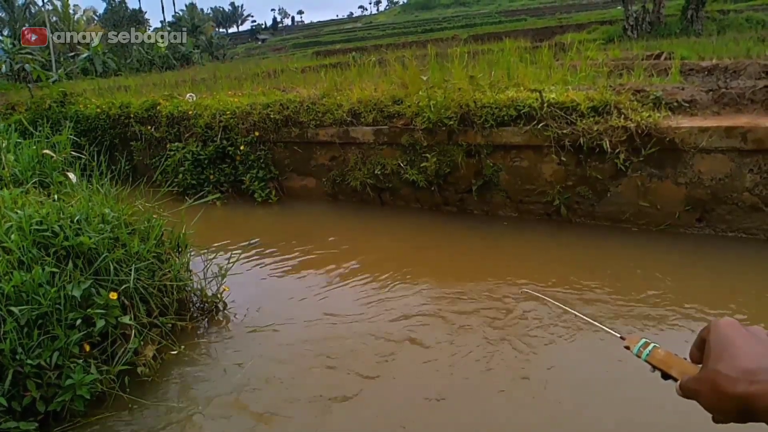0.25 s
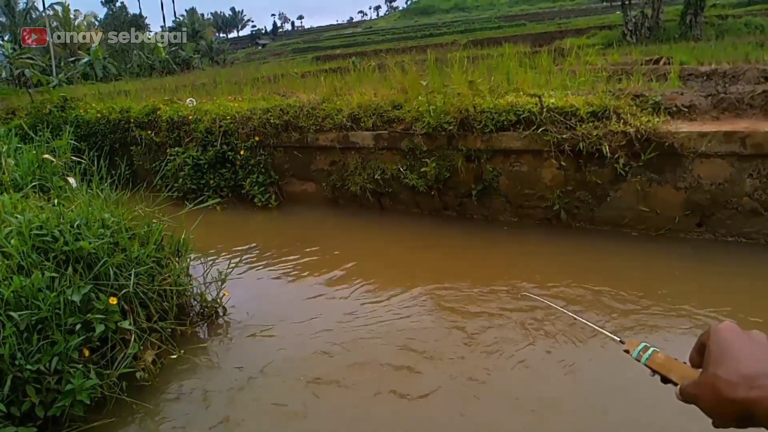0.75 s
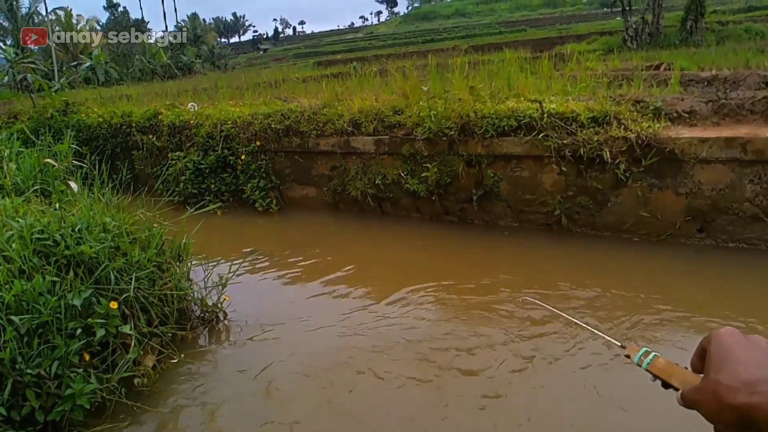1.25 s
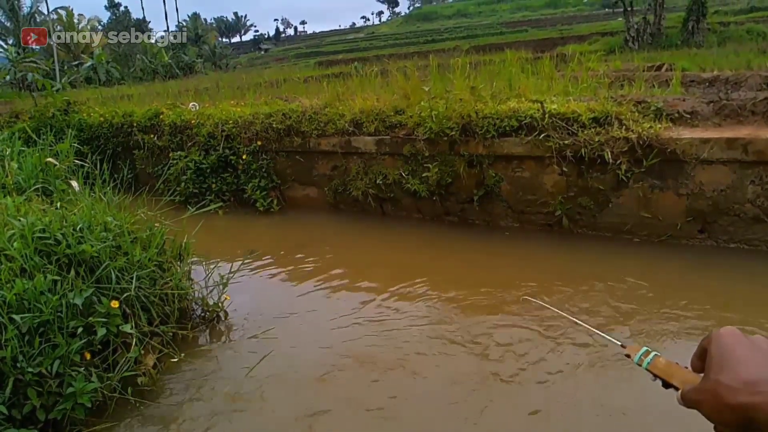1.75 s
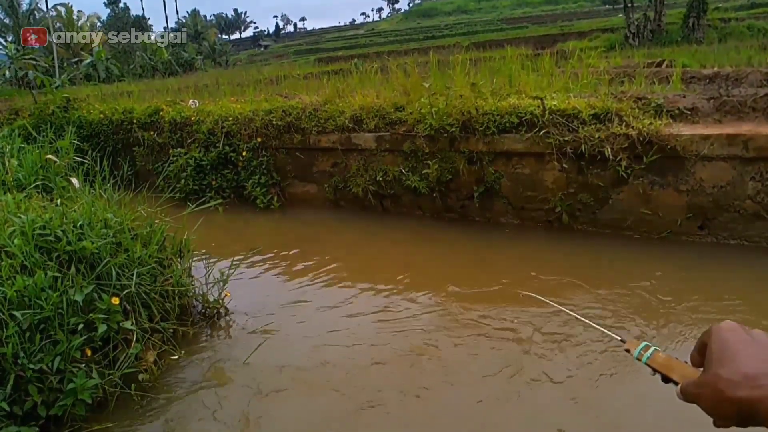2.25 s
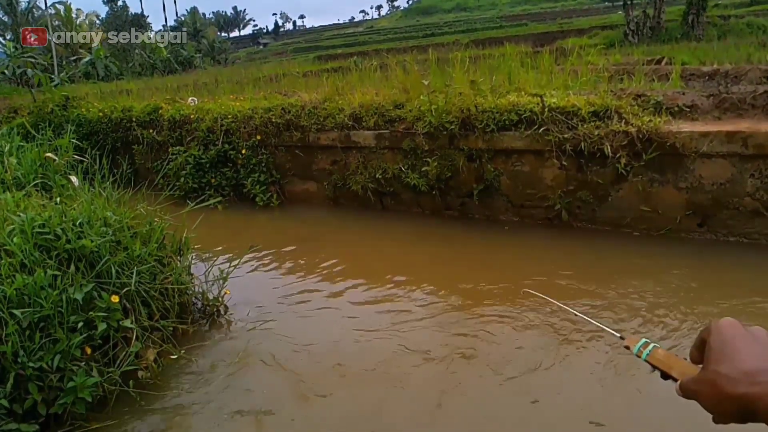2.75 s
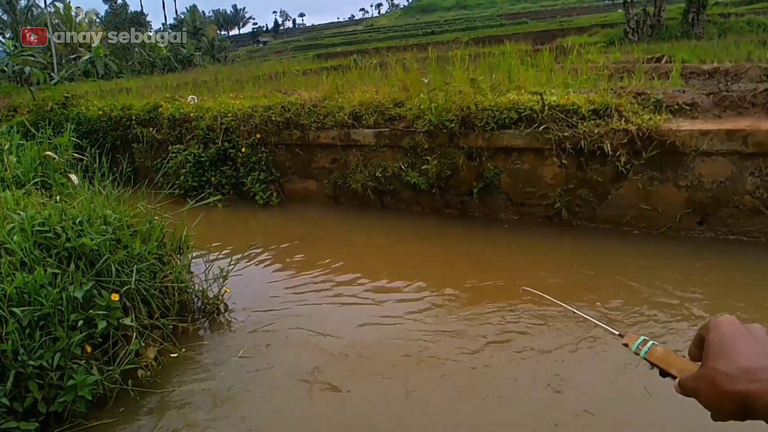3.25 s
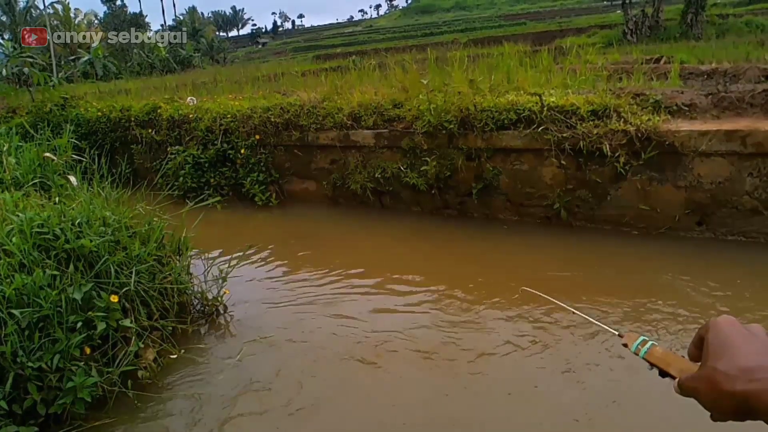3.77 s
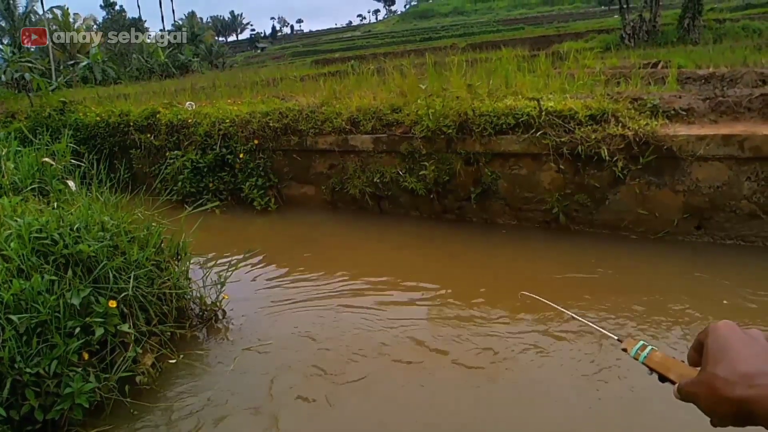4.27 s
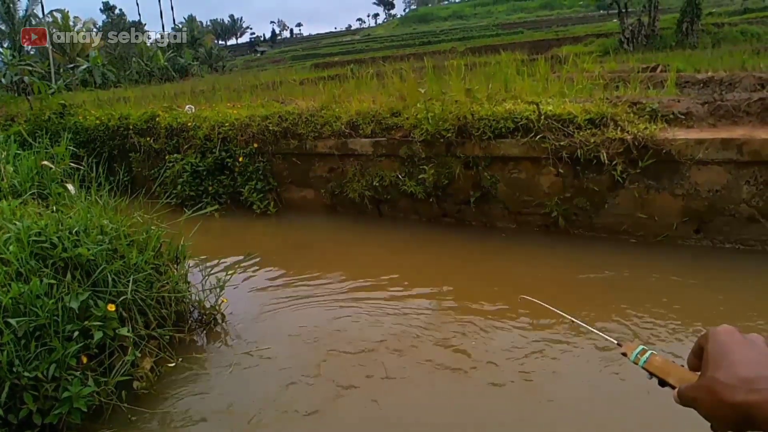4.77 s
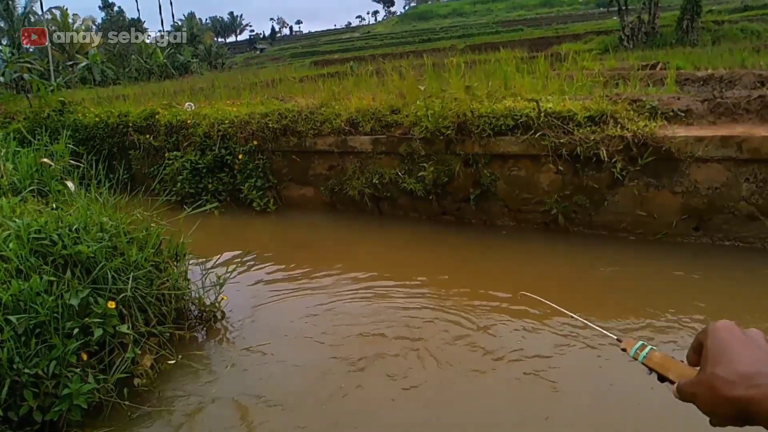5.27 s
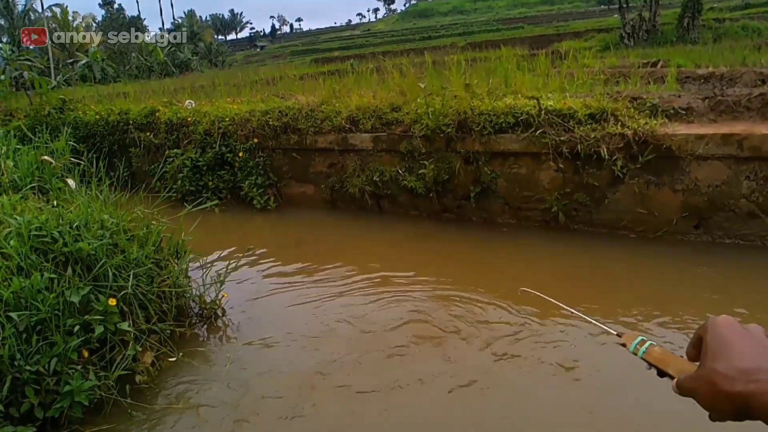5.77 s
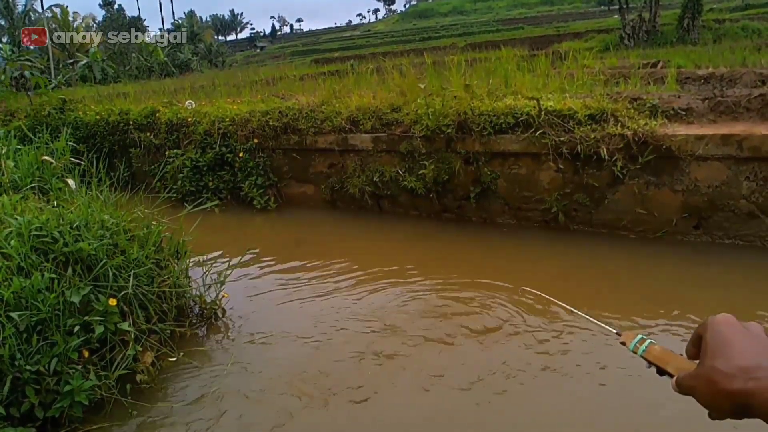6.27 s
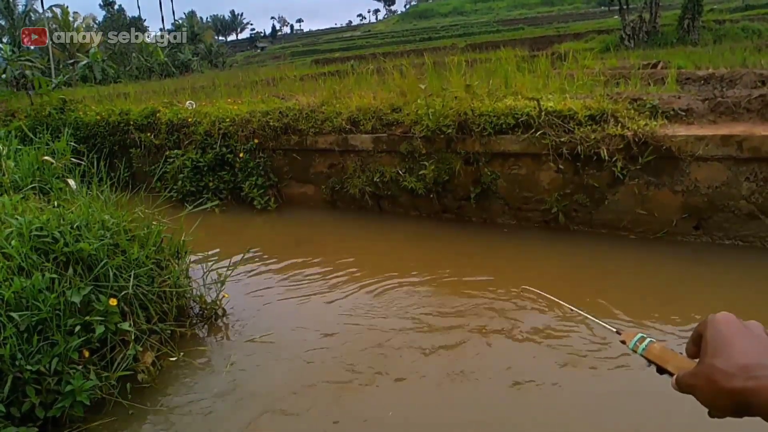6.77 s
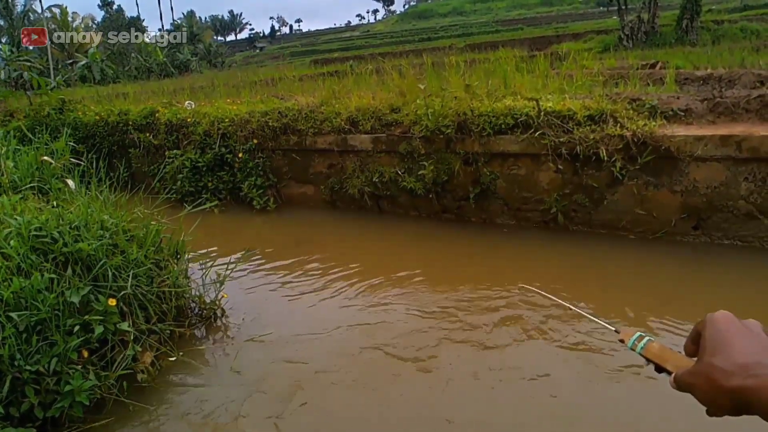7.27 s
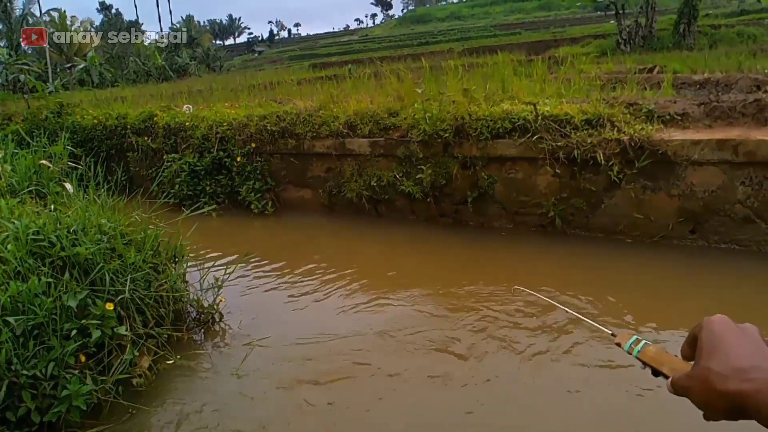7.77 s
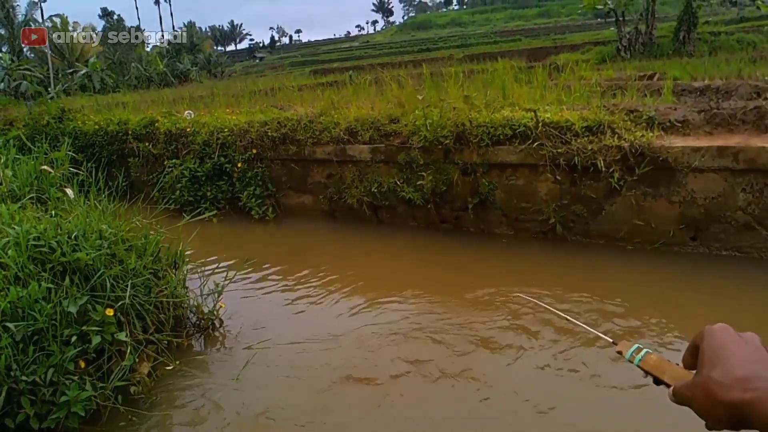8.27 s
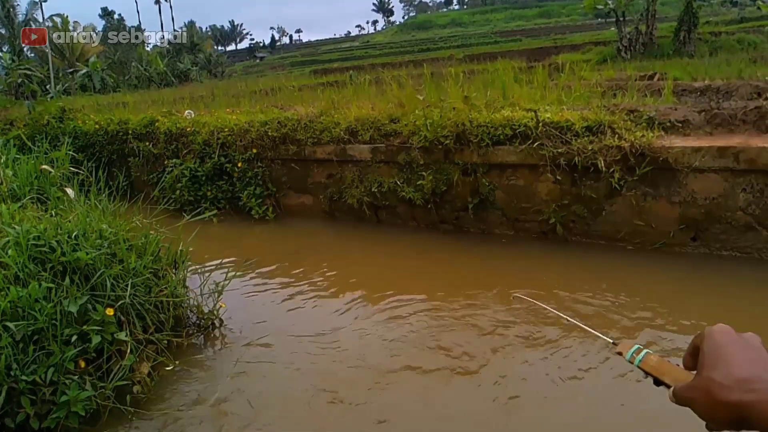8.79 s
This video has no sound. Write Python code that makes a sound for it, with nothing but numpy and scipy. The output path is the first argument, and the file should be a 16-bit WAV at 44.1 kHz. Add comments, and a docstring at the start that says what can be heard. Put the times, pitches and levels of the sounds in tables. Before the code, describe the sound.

In open fields, a small stream babbles close by without a break. High insect songs grow and stop abruptly in the grass, first a near pulsing buzz, then a more distant one, over trills and a faint shimmer. A few thin bird whistles come from far off. Beneath it all, a low distant drone fades and light wind rumbles on the microphone, gusting briefly towards the end.

```python
"""Muddy water runs steadily along a ditch between rice terraces: turbulent rush and ringing bubbles.
A light breeze rumbles on the microphone, with one gust, over a fading distant drone and faint hiss.
In the grass two bush crickets chirp and three crickets trill, scraper on wing file; their songs
swell, then break off. Far insects shimmer, and a small bird whistles now and then, far away."""
import sys
import numpy as np
from scipy import signal
from scipy.fft import rfft, irfft, next_fast_len
from scipy.io import wavfile
from scipy.ndimage import uniform_filter1d, map_coordinates

SR = 44100
rng = np.random.default_rng(int(sys.argv[2]) if len(sys.argv) > 2 else 0)


def transcribe(u):
    """Save the signal u as a 16-bit wav file named by the first command-line argument.

    u: samples, shape (n,) or (channels, n), limited to [-1, 1]; the rate is SR.
    q: integer samples, one column per channel.
    """
    v = np.clip(np.atleast_2d(u).T, -1, 1)
    q = np.round(v * 32767).astype(np.int16)
    wavfile.write(sys.argv[1], SR, q)


N = 398223


def amp(db):
    """Decibels to gain."""
    return 10 ** (np.asarray(db) / 20)


def unit(x):
    """x at rms 1."""
    return x / np.sqrt(np.mean(x ** 2) + 1e-20)


def wobble(knots_per_s):
    """Smooth random curve."""
    knots = rng.standard_normal(int(N * knots_per_s / SR) + 4)
    return map_coordinates(knots, [np.arange(N) * knots_per_s / SR])


def filtered(x, response):
    """x through a zero-phase gain response(hz)."""
    size = next_fast_len(N + SR // 2)
    return irfft(rfft(x, size) * response(np.fft.rfftfreq(size, 1 / SR)), size)[:N]


def coloured(x, spectrum):
    """x shaped by (frequency [Hz], level [dB]) points on a log axis, at rms 1."""
    points_hz, db = np.transpose(spectrum)
    return unit(filtered(x, lambda hz: amp(np.interp(np.log(hz + 1), np.log(points_hz), db))))


def patchy_noise(depth_db):
    """White noise with drifting patches of gain."""
    spectra = signal.stft(rng.standard_normal(N), nperseg=1024)[2]
    patches = uniform_filter1d(rng.standard_normal(spectra.shape), 6, axis=0)
    patches = uniform_filter1d(patches, 7, axis=1)
    return signal.istft(spectra * amp(depth_db * unit(patches)), nperseg=1024)[1][:N]


def bubbles(count, centre_hz, log_spread, decay_cycles, size_db):
    """Damped sines whose pitch rises as each bubble nears the surface."""
    t = np.arange(SR // 25) / SR
    hz = np.clip(centre_hz * np.exp(log_spread * rng.standard_normal((count, 1))), 200, 5000)
    age = t * hz / decay_cycles
    size = amp(size_db * np.minimum(rng.exponential(size=(count, 1)), 4))
    rise = 1 + 0.032 * np.minimum(age, 5)
    envelope = size * np.exp(-age) * (1 - np.exp(-t * hz))
    ring = envelope * np.sin(2 * np.pi * hz * t * rise)
    index = rng.integers(0, N, (count, 1)) + np.arange(len(t))
    return unit(np.bincount(index.ravel(), ring.ravel(), N)[:N])


def water():
    """Turbulent rush with a dense babble of bubbles; wavelets fold over and gurgle."""
    # rush spectrum: (frequency [Hz], relative level [dB])
    rush_spectrum = [(60, -14), (140, 4.5), (230, 3.5), (310, 1.5), (540, -2), (660, -1.5), (1000, -4),
                     (1330, -3), (1550, -8), (1850, -9.5), (2300, -15.5), (2650, -15), (3100, -23),
                     (6000, -34), (15000, -55)]
    # folding wavelets: (time [s], gurgle rise [dB])
    folds = [(2.645, 8.5), (3.06, 7), (3.8, 7)]
    t = np.arange(N) / SR
    rush = coloured(patchy_noise(depth_db=0.5), rush_spectrum)
    babble = bubbles(count=3500, centre_hz=850.4, log_spread=0.36, decay_cycles=8.5, size_db=2)
    fold_db = 2.2 * wobble(14) + sum(db * np.exp(-((t - at_s) / 0.024) ** 2) for at_s, db in folds)
    gurgle = bubbles(count=1500, centre_hz=1100.4, log_spread=0.2215, decay_cycles=12.4, size_db=2)
    flow_db = -47 + 0.56 * wobble(0.57)
    return amp(flow_db) * (amp(0.75) * rush + amp(-9) * babble + amp(fold_db - 12.5) * gurgle)


def air():
    """Breeze on the microphone with one gust, a slowly receding drone and an even hiss."""
    # wind rumble and hiss spectra: (frequency [Hz], relative level [dB])
    rumble_spectrum = [(10, -6), (30, 2.5), (57, 4.5), (75, -3), (120, -8), (200, -18.5), (400, -30),
                       (1500, -94)]
    hiss_spectrum = [(1500, -6.5), (3000, -0.5), (3700, 4), (4600, 7), (5300, 4.5), (6300, 3.5), (10500, 2),
                     (15500, 2)]
    drone_spectrum = [(60, -25), (93, -2.5), (120, -11), (250, -26.5), (600, -90)]
    gust_s, gust_width_s, gust_db = 8.04, 0.54, 7.5
    t = np.arange(N) / SR
    gust = np.exp(-((t - gust_s) / gust_width_s) ** 2)
    breeze_db = -44.5 + 0.7 * wobble(2.13) + gust_db * gust
    drone_db = -47.5 - 0.55 * t + 1.5 * wobble(1.484)
    rumble = amp(breeze_db) * coloured(rng.standard_normal(N), rumble_spectrum)
    drone = amp(drone_db) * coloured(rng.standard_normal(N), drone_spectrum)
    hiss = amp(-59.5) * coloured(rng.standard_normal(N), hiss_spectrum)
    return rumble + drone + hiss


def strokes(wing, stroke_hz, duty, rough, drift):
    """Each stroke drags the scraper over the file: a short rasp at the wing's resonances."""
    def response(hz):
        return np.sqrt(sum(amp(db) ** 2 / (1 + ((hz - centre_hz) / width_hz) ** 2) ** 3
                           for centre_hz, width_hz, db in wing))

    cycles = np.cumsum(stroke_hz * (1 + drift * wobble(6))) / SR
    pressure = np.exp(-((cycles % 1 - 0.5) / duty) ** 2)
    ring = signal.hilbert(unit(filtered(rng.standard_normal(N), response)))
    # pitch wanders from tooth to tooth; the drive evens out the strength
    rasp = ring.real / np.sqrt(np.abs(ring) ** 2 + rough ** 2)
    return unit(pressure * rasp)


def song_gain(voice):
    """Songs in one voice swell and break off; insects singing together add in power."""
    # songs: (voice, start [s], end [s], swell [s], opening gain [0-1], full level [dB])
    songs = [ ("near bush", 0, 4.295, 4.9, 0.38, -54.5), ("far bush", 4.25, 9.1, 3.1, 0.11, -60.5),
             ("low", 0, 11, .7, 0.76, -70), ("low", 2.3, 6.5, 3.3, 0.11, -62.5),
             ("near low", 6.33, 8.72, .06, .3, -61), ("high", 0, 2.27, 0.7, .35, -66),
             ("high", 7.8, 9.1, 1.2, .4, -70), ]
    break_off_s = 0.018
    t, power = np.arange(N) / SR, np.zeros(N)
    for song_voice, start_s, end_s, swell_s, opening, db in songs:
        if song_voice == voice:
            swell = opening + (1 - opening) * np.clip((t - start_s) / swell_s, 0, 1)
            release = np.clip(1 - (t - end_s) / break_off_s, 0, 1)
            power += (amp(db) * (t >= start_s) * swell * release) ** 2
    return np.sqrt(power)


def chirps(rate_hz, pause_at_s, slowing_hz_per_s, last_s, pause_share, depth, grow_db):
    """Each chirp grows, then dips briefly; the pace slackens and drags towards last_s."""
    # final drag: (lag [chirps], build-up time [s])
    drag = (.52, .11)
    lag_chirps, build_s = drag
    t = np.arange(N) / SR
    lag = lag_chirps * np.exp(np.minimum(t - last_s, 0) / build_s)
    cycles = rate_hz * (t - pause_at_s) - slowing_hz_per_s * (t - pause_at_s) ** 2 / 2 - lag
    from_pause = (cycles + 0.5) % 1 - 0.5
    gate = 1 - depth * np.exp(-(2 * from_pause / pause_share) ** 4)
    return gate * amp(grow_db * (cycles % 1 - 0.5))


def bush_crickets():
    """Two flickering wing buzzes, near then far, each cut into about eight chirps a second."""
    # wing resonances: (centre [Hz], width [Hz], relative level [dB])
    near_wing = [(8450, 300, -13), (9200, 170, -11), (9170, 160, -1), (9460, 150, -7.5)]
    far_wing = [(8400, 430, -10.5), (9270, 170, -3), (9150, 200, -0.5), (9580, 170, -3)]
    near_gate = chirps(rate_hz=7.92, pause_at_s=1.641, slowing_hz_per_s=0.03, last_s=4.3,
                       pause_share=0.24, depth=0.88, grow_db=1.5)
    far_gate = chirps(rate_hz=8.18, pause_at_s=6.851, slowing_hz_per_s=0.2, last_s=10,
                      pause_share=0.25, depth=0.72, grow_db=2)
    near = near_gate * strokes(near_wing, stroke_hz=122.8, duty=0.36, rough=0.97, drift=0.016)
    far = far_gate * strokes(far_wing, stroke_hz=121, duty=0.34, rough=0.72, drift=0.021)
    near_gain = song_gain("near bush") * amp(0.52 * wobble(24.3))
    far_gain = song_gain("far bush") * amp(1.1 * wobble(25))
    return near_gain * near + far_gain * far


def crickets():
    """Three trills at very even stroke rates; a nearer cricket takes over the low trill."""
    # wing resonances: (centre [Hz], width [Hz], relative level [dB])
    low_wing = [(6850, 620, -12), (7390, 180, 0), (7580, 490, -4.5)]
    high_wing = [(7870, 150, 5), (7900, 110, -2.8)]
    near_low_wing = [(7470, 240, 0)]
    low = strokes(low_wing, stroke_hz=116.8, duty=0.39, rough=1, drift=0.0028)
    high = strokes(high_wing, stroke_hz=119.5, duty=0.33, rough=1, drift=0.0037)
    near_low = strokes(near_low_wing, stroke_hz=116.8, duty=0.34, rough=0.75, drift=0.002)
    return low * song_gain("low") + high * song_gain("high") + near_low * song_gain("near low")


def chorus():
    """Far insects blur into a steady shimmer."""
    spectrum = [(6000, -33), (6900, 0.5), (7400, -21), (8100, -17),
                (8700, 3), (9300, 1), (9700, -6), (10300, -24)]
    return amp(-68) * coloured(rng.standard_normal(N), spectrum)


def bird():
    """Thin, slightly hoarse whistles that hold, then slide; louder where the pitch is higher."""
    # notes: (start [s], length [s], start pitch [Hz], end pitch [Hz], level at mean pitch [dB])
    notes = [(0.632, 0.17, 4620, 4330, -66.5), (.87, 0.085, 4870, 4760, -61),
             (3.245, .125, 4640, 4100, -61), (5.083, 0.065, 3780, 4400, -64), (6.94, .14, 4560, 4100, -64),
             (8.12, 0.066, 3800, 4080, -68)]
    tilt_db_per_octave, hoarse_hz = 22, 62
    calls = np.zeros(N + SR)
    for start_s, length_s, start_hz, end_hz, db in notes:
        count = int(length_s * SR)
        progress = np.linspace(0, 1, count)
        hz = start_hz + (end_hz - start_hz) * progress ** 2 + hoarse_hz * wobble(147)[:count]
        tilt_db = tilt_db_per_octave * np.log2(hz / hz.mean())
        envelope = amp(db + tilt_db) * np.abs(np.sin(np.pi * progress)) ** 0.5
        calls[round(start_s * SR):][:count] += envelope * np.sin(2 * np.pi * np.cumsum(hz) / SR)
    return calls[:N]


def bank_echo(x, t60_s):
    """The ditch wall and terraces scatter a short tail."""
    t = np.arange(SR // 3) / SR
    tail = rng.standard_normal(len(t)) * amp(-60 * t / t60_s)
    return signal.fftconvolve(x, tail / np.linalg.norm(tail))[:N]


def scene():
    """Mono mix: water and air, insects on the banks, the bird farther off."""
    insects = bush_crickets() + crickets()
    calls = bird()
    echo = bank_echo(amp(-14) * insects + amp(-7) * calls, t60_s=0.25)
    return (water() + air() + chorus() + insects + calls + echo)[None]


def record(dry):
    """The camera's band limit and silent DC offset."""
    cutoff_hz, dc_offset = 15600, 0.0795
    return dc_offset + filtered(dry[0], lambda hz: hz < cutoff_hz)[None]


dry = scene()
out = record(dry)
transcribe(out)
```